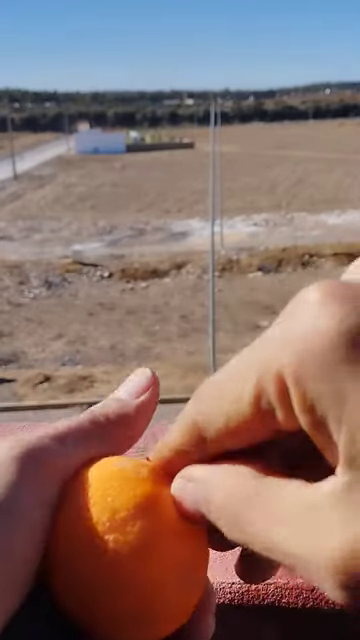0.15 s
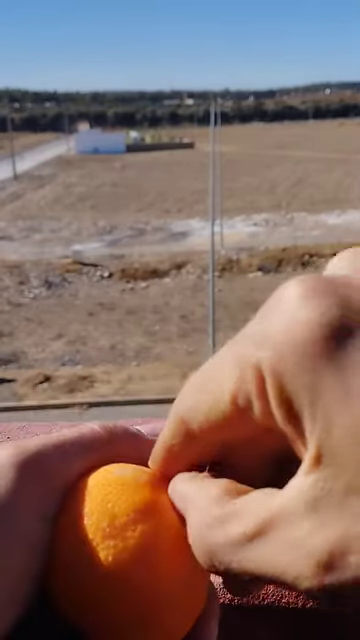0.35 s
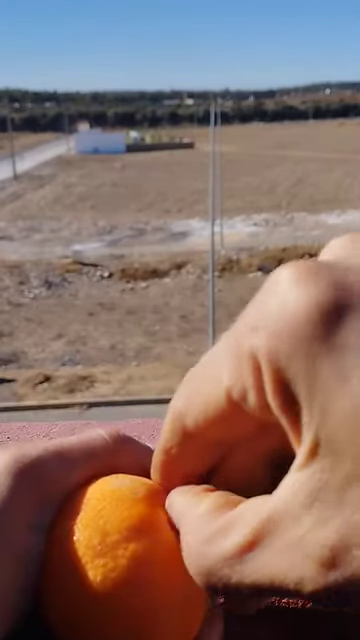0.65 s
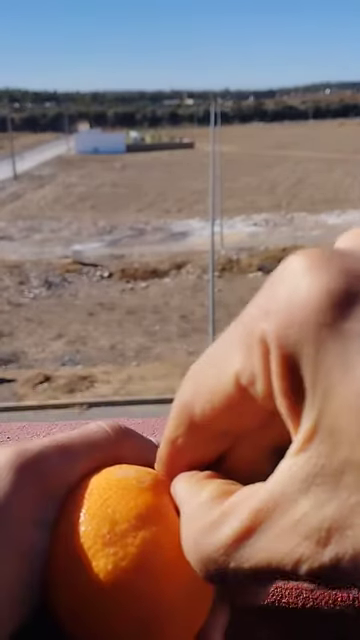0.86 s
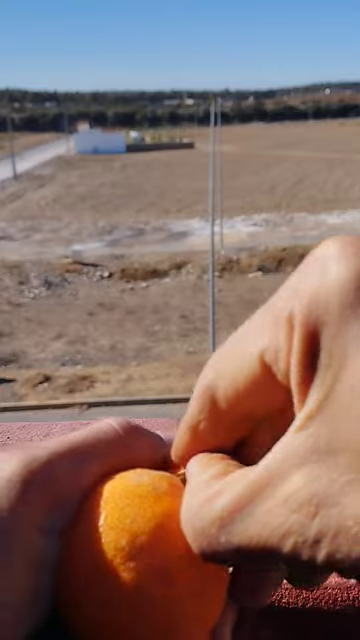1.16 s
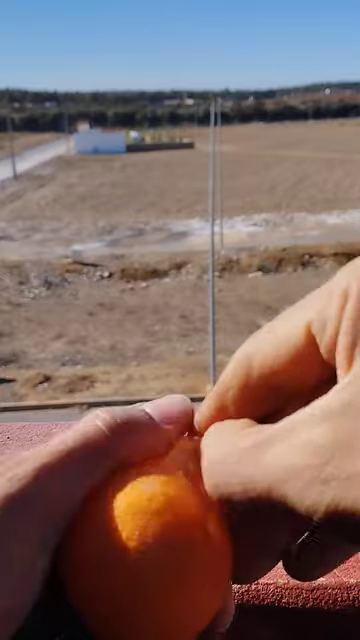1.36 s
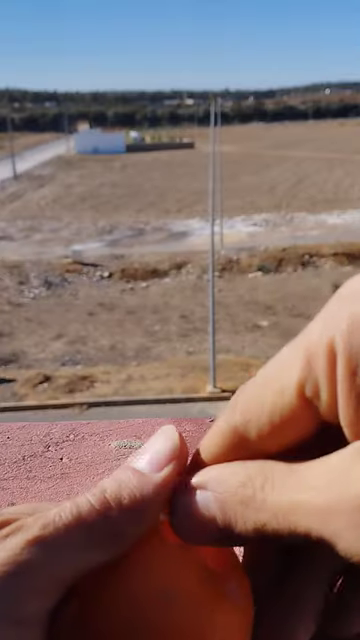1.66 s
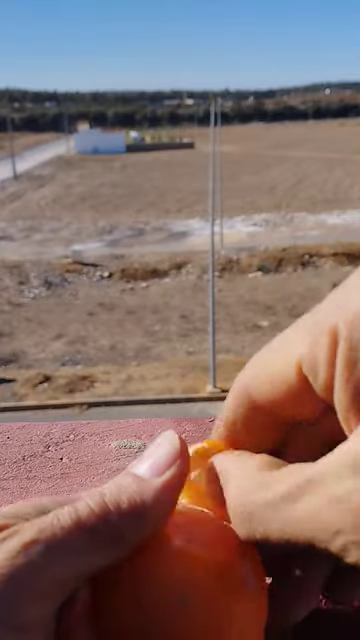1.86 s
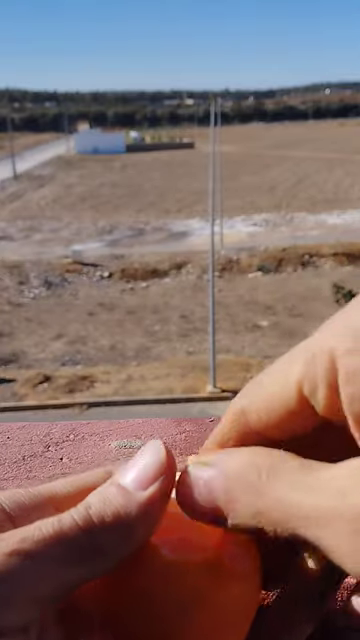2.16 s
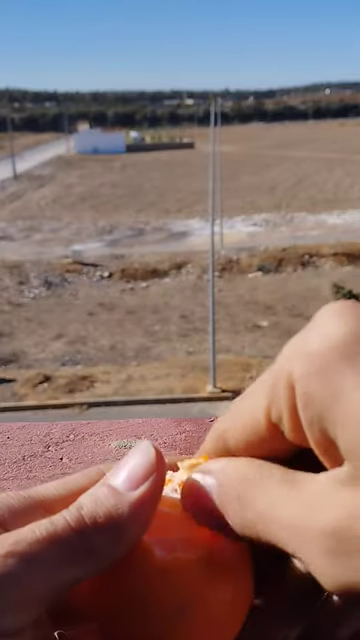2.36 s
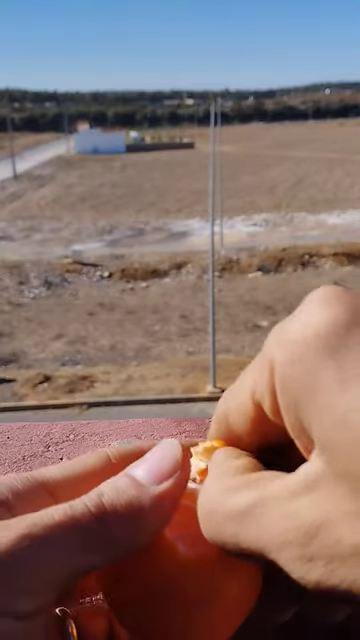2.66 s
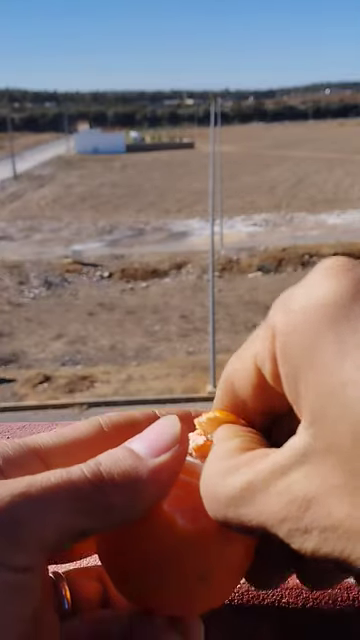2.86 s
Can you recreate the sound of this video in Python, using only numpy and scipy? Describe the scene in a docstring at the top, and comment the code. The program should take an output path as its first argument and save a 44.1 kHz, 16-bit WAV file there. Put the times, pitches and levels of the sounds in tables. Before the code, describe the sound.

Orange peeling, close and dry, outdoors. Faint finger slides and dull hand rubs at first, with tiny ticks near 0.6 and 1.0 s. Crisp rind snaps cluster from 1.2 to 1.56 s, strongest around 1.45-1.5, with light crackle. A pause, then denser tearing crackle and snaps at 1.98-2.2 s; faint rubs and ticks follow. Throughout, low breeze gusts, distant road roar and throbbing engines; a faint whine joins after 2.2 s.

```python
"""A light breeze rumbles over distant traffic and droning, throbbing engines, and fingers slide on fruit skin:
an orange is peeled by hand on a balcony, close to a phone. Breeze, road and fingers are shaped noise,
and the engines are wavering sines. A thumbnail breaks the rind in single snaps, each a click with
a ringing body and a crisp top, and a strip tears off in a fine crackle of many tiny pith clicks."""
import sys
import numpy as np
from scipy import signal
from scipy.fft import rfft, irfft
from scipy.io import wavfile
from scipy.ndimage import uniform_filter1d

SR = 44100
rng = np.random.default_rng(int(sys.argv[2]) if len(sys.argv) > 2 else 0)


def inscribe(sig):
    """Save sig as 16-bit PCM at rate SR to the path in sys.argv[1].

    A 1-D sig is mono; a 2-D sig holds one channel per row.
    Samples are clipped to [-1, 1] before scaling.
    """
    pcm = np.round(np.clip(np.atleast_2d(sig).T, -1, 1) * 32767)
    wavfile.write(sys.argv[1], SR, pcm.astype(np.int16))


N = 133182  # length in samples

BASS_PAN_DB = 0.05  # lean of the deep road roar and the drone; every pan is left minus right


def undb(db):
    """Decibels to gain."""
    return 10 ** (np.asarray(db) / 20)


def unit(x):
    """Scale to rms 1."""
    return x / np.sqrt(np.mean(x ** 2))


def curve(rows):
    """A control curve at every sample, from points in seconds."""
    return np.interp(np.arange(N) / SR, *np.array(rows).T)


def over_hz(rows, size=N):
    """Points joined on a log-frequency axis."""
    hz, value = np.array(rows).T
    return np.interp(np.log(np.fft.rfftfreq(size, 1 / SR) + 1), np.log(hz), value)


def noise(rows):
    """Noise of a given colour, rms 1."""
    white = rfft(rng.standard_normal(N))
    return unit(irfft(white * undb(over_hz(rows)), N))


def band(hz, width_hz):
    """Noise in one soft-edged band, rms 1."""
    offset = 2 * (np.fft.rfftfreq(N, 1 / SR) - hz) / width_hz
    white = rfft(rng.standard_normal(N))
    return unit(irfft(white / (1 + offset ** 4), N))


def above(x, hz):
    """The part of a sound above a frequency."""
    f = np.fft.rfftfreq(N, 1 / SR) + 1
    return irfft(rfft(x) / (1 + (hz / f) ** 10), N)


def walk(rate):
    """Smooth random wandering of rms 1, with a given number of steps per second."""
    k = max(int(SR / rate), 2)
    steps = np.repeat(rng.standard_normal(N // k + 1), k)
    return unit(uniform_filter1d(uniform_filter1d(steps, k), k)[:N])


def pan(db):
    """Left and right gains of constant power."""
    g = undb(np.array([db, -db]) / 2).reshape(2, -1)
    return g / np.sqrt(np.mean(g ** 2, axis=0))


def bell(middle, half):
    """A bell-shaped envelope, from its middle and half length in seconds."""
    return np.exp(-np.square((np.arange(N) / SR - middle) / half))


def click(rows, side=0, size=512):
    """Causal click of unit energy: whole (0), its body (towards -1) or its crisp top (1)."""
    cross_hz = 8500
    f = np.fft.rfftfreq(size, 1 / SR) + 1
    split = 1e-3 + 1 / (1 + (cross_hz / f) ** (14 * side))
    gain = undb(over_hz(rows, size)) * split / (1 + (f / 16500) ** 30)
    # fold the cepstrum so that the energy comes as early as possible (minimum phase)
    cepstrum = irfft(np.log(gain))
    cepstrum[1:size // 2] *= 2
    cepstrum[size // 2 + 1:] = 0
    h = irfft(np.exp(rfft(cepstrum)))
    return h / np.sqrt(np.sum(h ** 2))


def at_ports(x):
    """The left port hears the orange first and, in the high treble, louder."""
    # Treble balance of the two ports. Each row: frequency in Hz, left minus right in dB.
    port_tilt = [(7000, -0.5), (9000, 4.5), (11000, 11), (13500, 6)]
    lag_s = .00005
    spec = rfft(x) * pan(over_hz(port_tilt))
    spec[1] *= np.exp(-2j * np.pi * np.fft.rfftfreq(N, 1 / SR) * lag_s)
    return irfft(spec, N)


def scattered(pulse, hands_db, wall_db, size=2048):
    """A pulse, its bounce off the cupped hand, and short tails off hands and wall that differ at each port."""
    hands_decay_s, wall_decay_s = .0014, 0.0081
    cup_delay_s, cup_db, cup_pan_db = 0.001252, -10, -9  # the bounce goes mostly into the right port
    t, paths = np.arange(size) / SR, np.zeros((2, size))
    for db, decay in ((hands_db, hands_decay_s), (wall_db, wall_decay_s)):
        envelope = np.exp(-t / decay) * (1 - np.exp(-10 * t / decay))
        tail = rng.standard_normal((2, size)) * envelope
        paths += undb(db) * unit(tail) / np.sqrt(size)
    paths[:, 0] = 1  # the direct sound
    bounce = int(cup_delay_s * SR * rng.uniform(.85, 1.15))
    paths[:, bounce] += undb(cup_db) * pan(cup_pan_db)[:, 0]
    return signal.fftconvolve(pulse[None], paths, axes=1)


def traffic():
    """Far road roar, most alike left and right in the bass and diffuse on top, where the tyre wash comes and goes."""
    # Colour of the road roar. Each row: frequency in Hz, relative level in dB per Hz.
    road_colour = [(15, -8.5), (55, 1.5), (80, -3), (120, -5), (170, -3), (260, -10), (400, -13.5),
                   (700, -16.5), (1050, -20), (1250, -23), (1550, -27), (1850, -33), (2600, -36.5),
                   (3200, -45.5), (5000, -55.5), (8000, -70), (16000, -66)]
    # Likeness of the roar at the two ports. Each row: frequency in Hz, coherence.
    likeness = [(20, 0.43), (60, 0.84), (130, 1), (290, 0.68), (640, 0.76), (1100, 0.71), (1500, 0.35),
                (2700, 0.53), (6000, 0.12), (16000, 0.045)]
    # How far the left port leads. Each row: frequency in Hz, phase in radians.
    left_lead = [(300, 0), (860, 0.45), (1210, 1.9), (1550, 0.89), (2600, 2.37)]
    # Rise and fall of the tyre wash. Each row: time in seconds, gain in dB.
    wash_level = [(0, -0.5), (.28, 1), (.48, -.5), (1.02, 1.5), (1.14, -0.5), (1.5, 1), (1.75, 0), (2.0, 3),
                  (2.2, -1), (2.38, 1.5), (2.8, -2.5)]
    traffic_db, traffic_pan_db = -50.5, 2
    wash_hz, flutter_db, flutter_rate = 734, 1.3, 10.32
    alike = np.clip(over_hz(likeness), -.99, .99)
    mid = rfft(noise(road_colour)) * np.sqrt(1 + alike)
    side = rfft(noise(road_colour)) * np.sqrt(1 - alike)
    pair = np.array([mid + side, (mid - side) * np.exp(-1j * over_hz(left_lead))])
    lean = pan(over_hz([(200, BASS_PAN_DB), (380, traffic_pan_db)]))
    roar = unit(irfft(pair * lean, N))
    wash, upper = above(roar, wash_hz), above(roar, 2 * wash_hz)
    # the lower and upper wash flutter independently
    uneven = sum(part * undb(curve(wash_level) + flutter_db * walk(flutter_rate))
                 for part in (wash - upper, upper))
    return undb(traffic_db) * (roar - wash + uneven)


def tones(rows, waver, flutter_db):
    """Engine tones that waver in pitch and flutter in level on their long way through the air."""
    out = 0
    for hz, db in rows:
        turns = np.cumsum(hz * (1 + waver * walk(14))) / SR + rng.random()
        fluttering = np.sin(2 * np.pi * turns) * undb(flutter_db * walk(14))
        out = out + undb(db) * unit(fluttering)
    return out


def engines():
    """A far drone, thrum, hum and a throb of two close beating pitches, joined late by a second vehicle's whine."""
    # Steady drone tones. Each row: frequency in Hz, level before the swell in dB.
    drone_tones = [(140, -60.5), (171, -63), (200, -65.5), (246, -69.5), (324, -67.5), (383, -77.5)]
    # Swell of the drone. Each row: time in seconds, gain in dB.
    drone_swell = [(0, -4), (.45, -0.5), (.9, 0.5), (1.25, -0.5), (1.58, 4.5), (1.92, -2.5), (2.15, -1.5),
                   (2.7, -2), (3.02, -6)]
    # Deepest engine tone. Each row: time in seconds, level in dB.
    thrum_level = [(0, -60.5), (.42, -52.5), (.95, -61.5), (1.35, -51.5), (1.65, -52.5), (2.05, -61),
                   (2.45, -47), (2.7, -52.5), (3.02, -48.5)]
    # Second deep engine tone. Each row: time in seconds, level in dB.
    hum_level = [(0, -62), (.28, -57.5), (.45, -49.5), (.7, -52), (1.15, -54.5), (1.6, -47), (1.9, -59.5),
                 (2.3, -50), (2.55, -59.5), (3.02, -57)]
    # Throbbing tone, the clearest. Each row: time in seconds, level of its stronger pitch in dB.
    throb_level = [(0, -63.5), (.16, -63.5), (.45, -62.5), (1.28, -63), (1.58, -52.5), (1.88, -62),
                   (2.15, -58), (2.45, -60), (2.71, -55.5), (2.85, -66)]
    # Late second vehicle. Each row: frequency in Hz, full level in dB, start of its rise in seconds.
    whine_tones = [(519, -68, 2.22), (565.5, -65.5, 2.14), (584, -67, 2.23), (650, -70, 2.52),
                   (698, -71, 2.53)]
    thrum_hz, hum_hz, whine_rise_s = 63.86, 97.8, 0.21
    throb_hz, beat_hz, beat_db = 282.4, 6.6, -5
    throb_pair = [(throb_hz, 0), (throb_hz + beat_hz, beat_db)]
    parts = ((drone_tones, drone_swell), ([(thrum_hz, 0)], thrum_level),
             ([(hum_hz, 0)], hum_level), (throb_pair, throb_level))
    drone = sum(tones(rows, waver=0.00768, flutter_db=3) * undb(curve(level)) for rows, level in parts)
    whine = 0
    for hz, db, start in whine_tones:
        rise = np.clip((np.arange(N) / SR - start) / whine_rise_s, 0, 1)
        whine = whine + tones([(hz, db)], waver=0.01395, flutter_db=1) * rise
    return pan(BASS_PAN_DB) * drone + whine


def breeze(apart=0.74, pan_db=-5):
    """Light gusts rumble on the ports, partly alike and partly separate at each."""
    # Strength of the gusts. Each row: time in seconds, level in dB.
    gust_level = [(0, -42.5), (.08, -43.5), (.25, -50), (.58, -58.5), (.69, -42.5), (.8, -49), (1.1, -53),
                  (1.35, -45), (1.55, -52.5), (1.72, -47), (1.9, -52.5), (2.5, -55.5), (3.02, -57)]
    # Colour of the rumble. Each row: frequency in Hz, relative level in dB.
    gust_colour = [(8, -5.5), (25, -7.5), (55, -5), (78, -12.5), (200, -32.5), (1000, -76)]
    gusts = noise(gust_colour) + apart * np.array([noise(gust_colour), noise(gust_colour)])
    return pan(pan_db) * unit(gusts) * undb(curve(gust_level))


def fingers(grain_db=1.5, grain_rate=400, pan_db=-2):
    """Skin slides unevenly over the peel as grainy noise; the hands rub dully as they shift their grip."""
    # Finger slides. Each row: middle in seconds, half length in seconds, level before the grain in dB,
    # centre in Hz, width in Hz.
    slides = [(0.038, 0.043, -78, 9060, 13000), (0.173, 0.079, -77, 5200, 6050),
              (0.174, 0.067, -76, 13900, 6000), (.555, .025, -80, 5500, 4500),
              (0.623, 0.085, -79, 2350, 1200), (0.772, 0.006, -89, 13000, 5000),
              (1.112, .008, -82, 13000, 5000), (1.203, 0.028, -78.5, 3600, 900),
              (1.3, .07, -77, 14200, 3500), (1.723, 0.026, -74, 4650, 3800),
              (1.923, 0.064, -82, 14100, 3500), (2.25, 0.019, -76, 2770, 400),
              (2.287, .012, -78, 4370, 1500), (2.525, 0.3, -79, 2370, 1200),
              (2.562, 0.013, -78, 5200, 3800), (2.597, .008, -82, 5000, 2500),
              (2.718, 0.0037, -73, 5600, 4000), (2.892, 0.06, -80.5, 6400, 1500),
              (2.998, 0.056, -77, 6330, 2020)]
    # Dull rubs of the hands. Each row: middle in seconds, half length in seconds, level in dB.
    rubs = [(.2, 0.11, -59), (.68, 0.068, -55), (1.32, 0.13, -51.5), (1.96, 0.07, -52.5)]
    slide = 0
    for middle, half, db, hz, width in slides:
        rustle = np.array([band(hz, width), band(hz, width)])
        slide = slide + undb(db) * bell(middle, half) * rustle
    grainy = slide * undb(grain_db * walk(grain_rate))
    rub_envelope = sum(undb(db) * bell(middle, half) for middle, half, db in rubs)
    return at_ports(pan(pan_db) * grainy) + rub_envelope * band(172, width_hz=99)


def fibres():
    """A stream of tiny breaks of uneven size, each a click of pith, rms 1."""
    # Colour of the tearing pith. Each row: frequency in Hz, relative level in dB.
    pith_colour = [(600, -7), (1500, 3.5), (2200, -1), (2900, -3.5), (3400, 8), (3900, 0), (5000, 2.5),
                   (6900, 0), (8200, -10), (9800, -5), (11200, -10), (13200, -3.5), (15500, -4)]
    per_s, spread_db = 2000, 3.0
    breaks = (rng.random(N) < per_s / SR) * rng.choice([-1, 1], N)
    sizes = undb(spread_db * np.minimum(rng.exponential(size=N), 5))
    return unit(signal.fftconvolve(breaks * sizes, click(pith_colour))[:N])


def pith(apart=1.3, jerk_db=1.66, jerk_rate=220, pan_db=-1.5):
    """Fibres part in small jerks as the peel lifts; the fingers scatter them and shade some from either port."""
    # Force of the tearing. Each row: time in seconds, level before the jerks in dB.
    tear_level = [(1.1, -99), (1.21, -78), (1.26, -77), (1.30, -70), (1.34, -70), (1.38, -75),
                  (1.46, -67.5), (1.52, -73), (1.55, -64.5), (1.58, -74), (1.66, -80), (1.86, -79.5),
                  (1.97, -74), (1.99, -65), (2.06, -65), (2.10, -61), (2.15, -62.5), (2.19, -69),
                  (2.22, -72), (2.27, -78), (2.38, -81)]
    crackle = fibres() + apart * np.array([fibres(), fibres()])
    paths = scattered(np.ones(1), hands_db=-5, wall_db=-14)
    crackle = unit(signal.fftconvolve(crackle, paths, axes=1)[:, :N])
    jerky = undb(curve(tear_level) + jerk_db * walk(jerk_rate))
    return at_ports(pan(pan_db) * crackle * jerky)


def rind():
    """Each snap is one sharp break; its body rings briefly in the loosened flap, its top is crisp."""
    # Snaps of the rind. Each row: start in seconds, relative body level in dB, relative top level in dB,
    # pan left minus right in dB, ring of the flap in Hz.
    snaps = [(.6060, -56, -51, 0, 6000), (1.0155, -48.5, -43, -2.5, 5570), (1.2288, -40, -44, 3, 4250),
             (1.2808, -36.5, -37.5, -4, 3770), (1.3337, -40, -46, 0, 4500), (1.3352, -44, -38.5, 0, 5000),
             (1.341, -49, -52, 3, 5000), (1.4048, -41, -41.5, 5, 5500), (1.4376, -50, -49, 1, 5000),
             (1.448, -30, -29.5, 1.5, 4770), (1.4674, -45, -56, -2, 4500), (1.4697, -41, -57, -5, 4800),
             (1.5020, -48, -50, 8, 5000), (1.5067, -26.5, -39, 1.5, 4220), (1.5114, -49, -42, 7, 5500),
             (1.54, -44, -52, 0, 4000), (1.548, -48, -50, 0, 5000), (1.5586, -40.5, -44.5, 2, 5300),
             (1.9829, -36, -45, -5, 4700), (1.9874, -50, -48, -4, 5500), (2.0014, -48, -48, -2, 6000),
             (2.035, -30, -35, -1.5, 6060), (2.0926, -38.5, -37, 0, 6600), (2.097, -38, -37, -4, 6300),
             (2.1008, -39, -42.5, 4.5, 6600), (2.116, -44, -52, -12, 5000), (2.1315, -42, -49, 3, 6000),
             (2.1343, -44, -42, 4, 5800), (2.1623, -39, -47, 4, 6600), (2.1752, -40, -41, -1, 5840),
             (2.1990, -45, -44, -3, 6000), (2.203, -32, -34, 4.5, 6300), (2.5535, -53, -66, -3, 4200),
             (2.7170, -47.5, -65, -14, 5230)]
    # Colour of the breaking rind. Each row: frequency in Hz, relative level in dB.
    rind_colour = [(300, -29), (1000, 0), (1900, -5.5), (2850, -6), (3400, -.5), (4600, 0), (6900, 0.5),
                   (7600, 2.5), (8250, -6), (9700, -3.5), (11200, -8.5), (13200, -4.5), (15500, -9)]
    snap_db, flap_db, flap_octaves = 0.5, 9.5, 0.63  # overall gain, boost at the ring and its width
    out, top = np.zeros((2, N)), click(rind_colour, side=1)
    hz = np.geomspace(100, 20000, num=200)
    colour_hz, colour_db = np.array(rind_colour).T
    colour = np.interp(np.log(hz), np.log(colour_hz), colour_db)
    for start, body_db, top_db, pan_db, ring_hz in snaps:
        flap = flap_db * np.exp(-np.square(np.log2(hz / ring_hz) / flap_octaves))
        body = click(np.column_stack([hz, colour + flap]), side=-0.86)
        snap = undb(body_db) * scattered(body, hands_db=-9, wall_db=-14)
        snap = snap + undb(top_db) * scattered(top, hands_db=-7, wall_db=-17)
        i = int(start * SR)
        out[:, i:i + snap.shape[1]] += undb(snap_db) * pan(pan_db) * snap
    return at_ports(out)


def scene():
    """Traffic, engines and breeze behind; fingers, pith and rind in front."""
    return traffic() + engines() + breeze() + fingers() + pith() + rind()


def record(dry):
    """The phone adds faint hiss and cuts the top."""
    # Colour of the hiss. Each row: frequency in Hz, relative level in dB.
    hiss_colour = [(1000, -1), (3000, 2), (6800, -4.5), (8200, -7.5), (10000, -6), (11200, -9.5),
                   (13000, -4), (15500, -7)]
    hiss_db, top_hz = -78.5, 15600
    hiss = undb(hiss_db) * np.array([noise(hiss_colour), noise(hiss_colour)])
    lowpass = signal.ellip(8, .2, 60, top_hz, fs=SR, output="sos")
    return signal.sosfilt(lowpass, dry + hiss)


dry = scene()
out = record(dry)
inscribe(out)
```